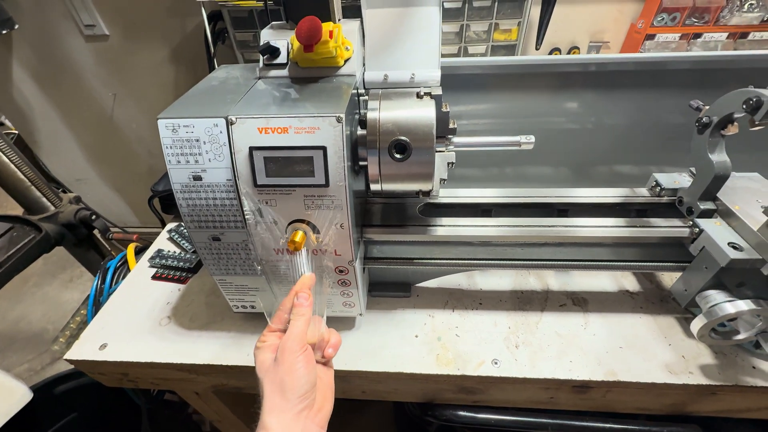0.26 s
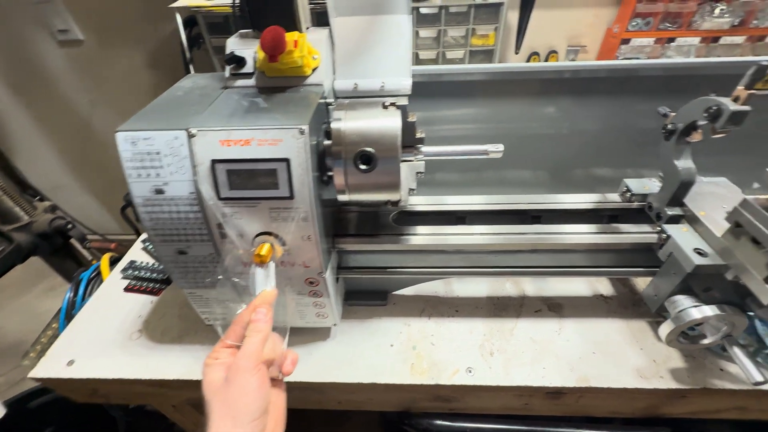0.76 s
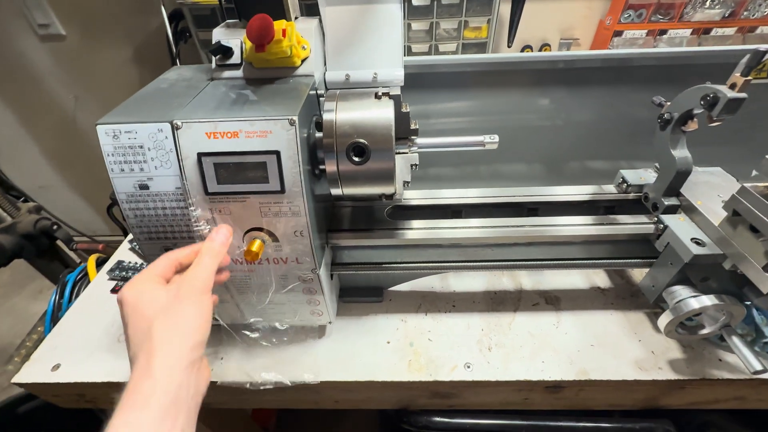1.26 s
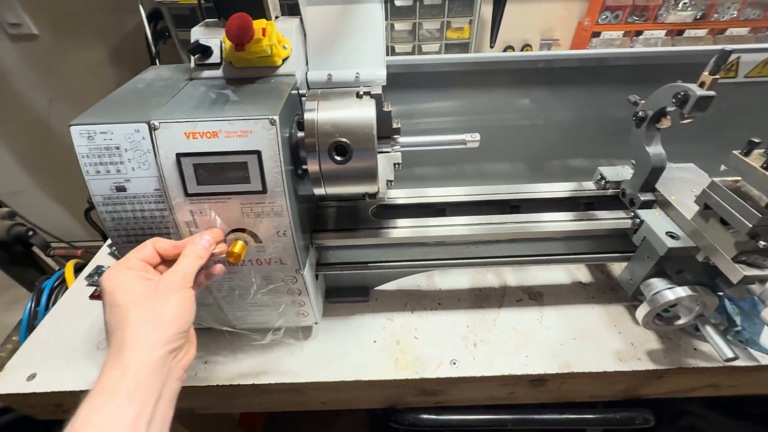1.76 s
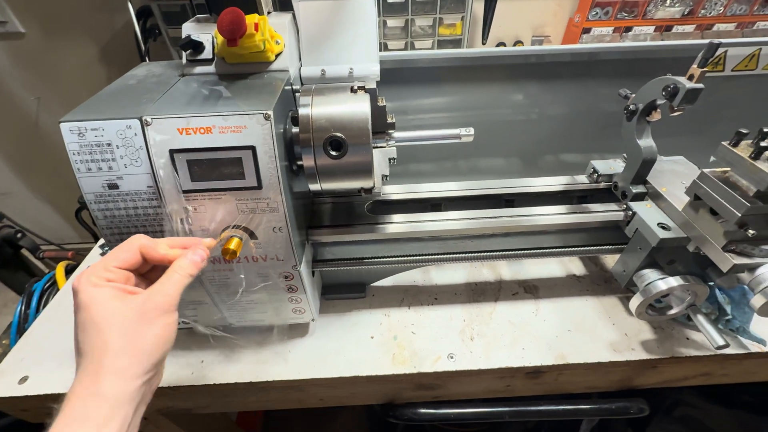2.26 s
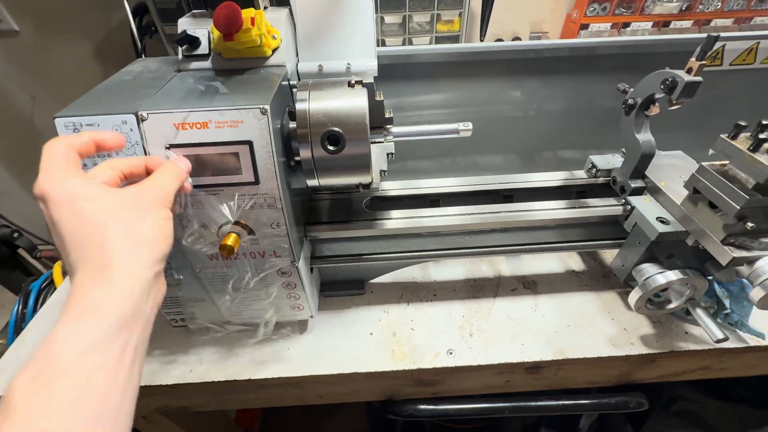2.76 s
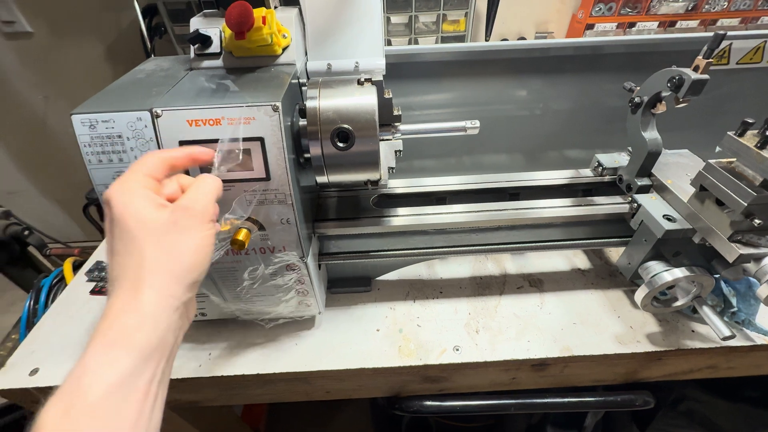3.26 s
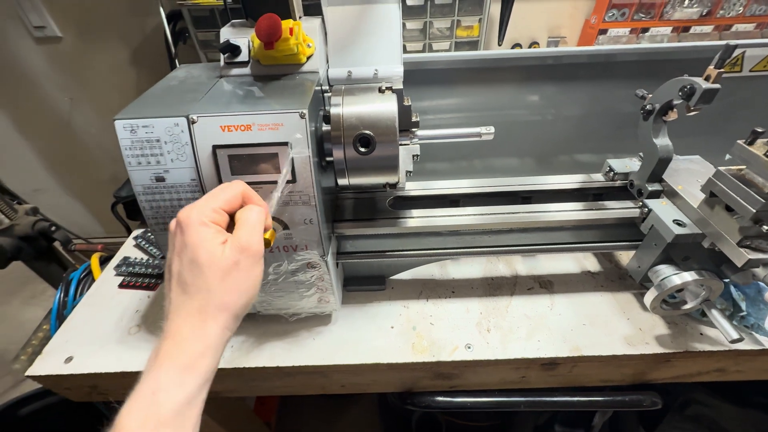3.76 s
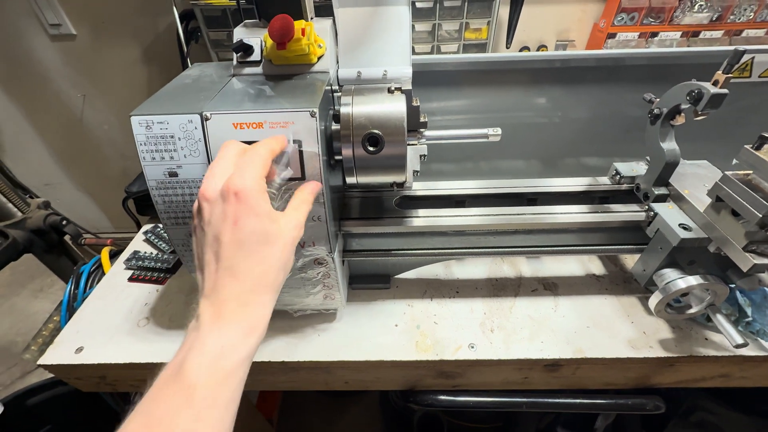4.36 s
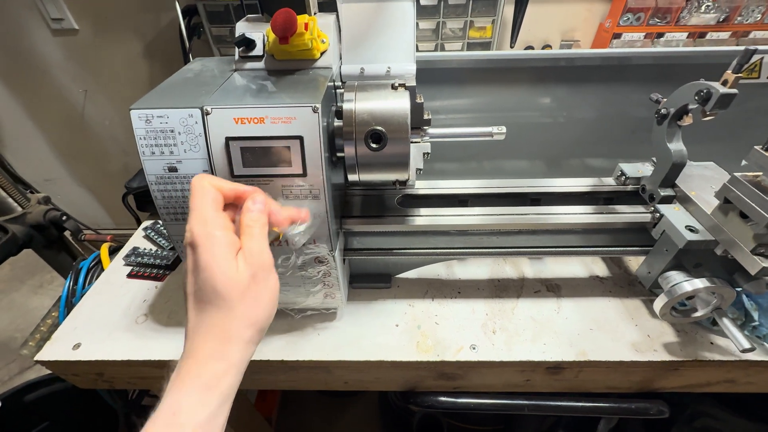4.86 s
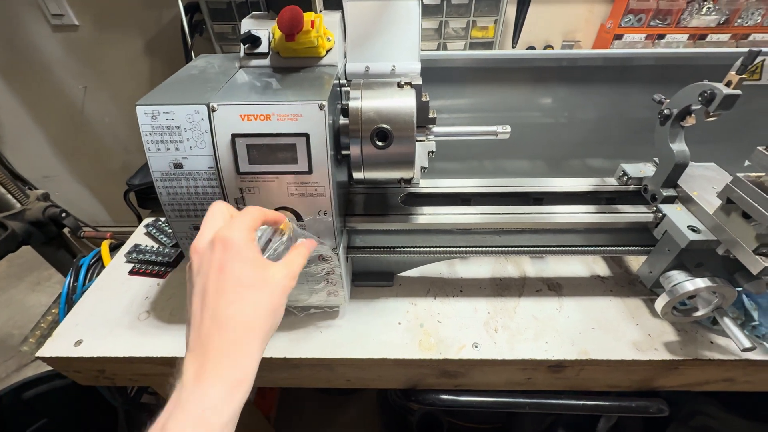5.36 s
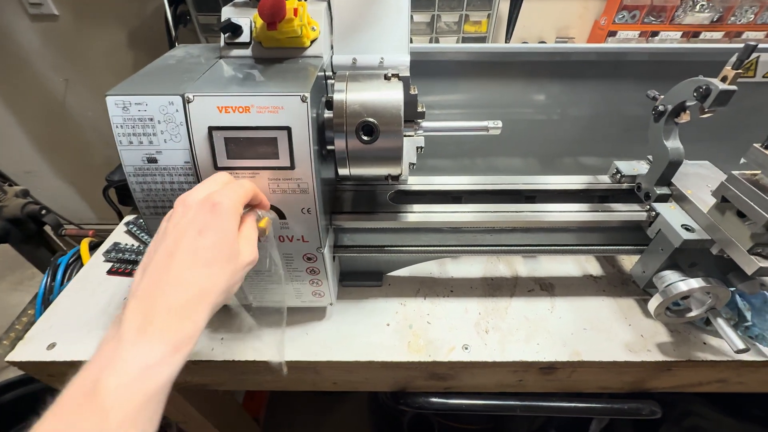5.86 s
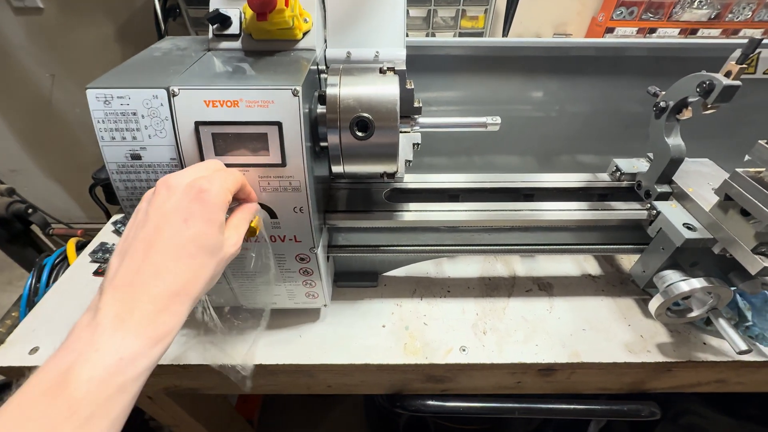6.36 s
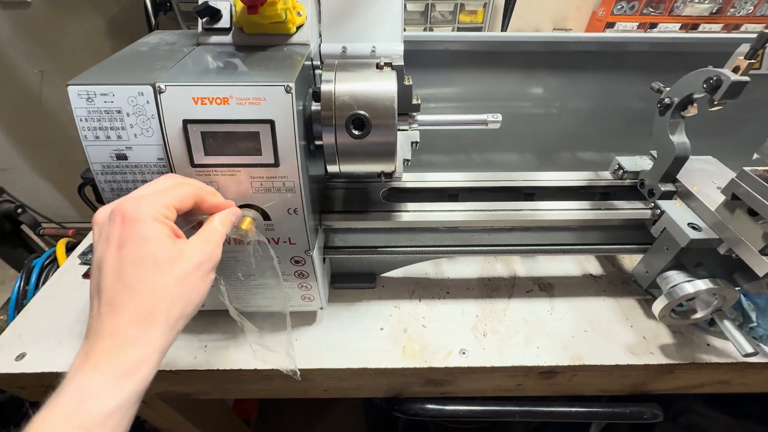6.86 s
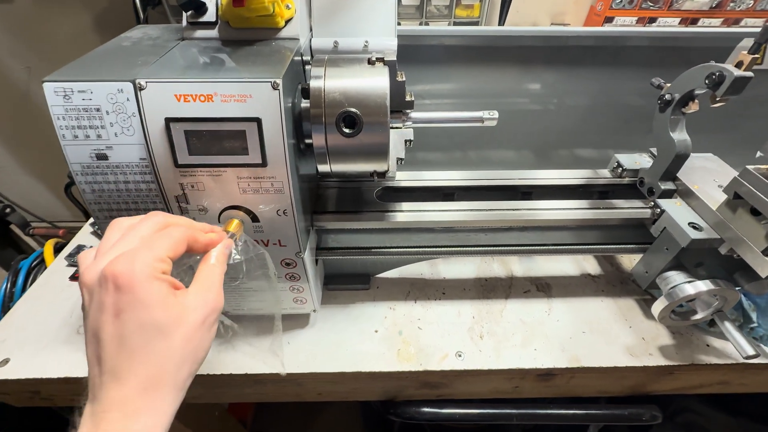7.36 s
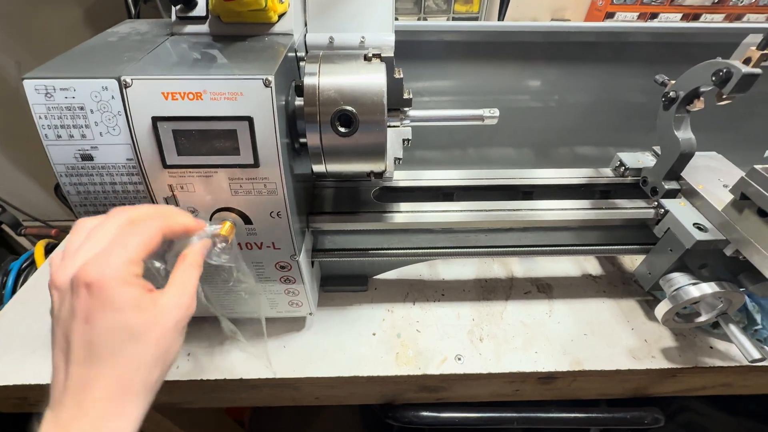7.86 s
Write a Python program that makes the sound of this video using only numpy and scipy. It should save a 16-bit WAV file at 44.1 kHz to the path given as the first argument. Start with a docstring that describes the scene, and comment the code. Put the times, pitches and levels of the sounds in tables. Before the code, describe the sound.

Protective plastic film is pulled by hand from a sheet-metal machine front. Loud irregular snaps with a short metallic ring come first, then a dense burst of coarse ripping around two seconds, a bright fizzing peel in several strokes, and finally light crinkles and ticks as loose film is picked from a knob. Close stereo microphones in a small workshop, short reverberation, soft room noise and a faint wavering hum.

```python
"""Loud snaps of glue letting go, then a long fizzing peel, as protective film is pulled by hand off the
sheet-metal front of a new lathe in a small workshop; the loose film crinkles as it is picked from a knob.
Snaps are short noise bursts with facet rings and bright clicks; peeling and picking are trains of random slips.
Decaying resonances give the panel's ring and short thuds, pops and thin rings; gliding tones squeak.
Behind them is soft room noise with a faint wavering hum."""
import sys
import numpy as np
from scipy import signal
from scipy.fft import rfft, irfft, next_fast_len
from scipy.io import wavfile
from scipy.ndimage import uniform_filter1d

SR = 44100
rng = np.random.default_rng(int(sys.argv[2]) if len(sys.argv) > 2 else 0)


def generate_wav(signal):
    """Clip the signal to [-1, 1] and save it as 16-bit WAV at the path in sys.argv[1]."""
    frames = np.transpose(np.atleast_2d(signal))
    scaled = np.clip(frames, -1, 1) * 32767
    pcm = np.round(scaled).astype(np.int16)
    wavfile.write(sys.argv[1], SR, pcm)


N = 358091
TIME = np.arange(N) / SR  # [s]


def from_db(db):
    """Decibels to amplitude gain."""
    return np.exp(np.asarray(db) * (np.log(10) / 20))


def unit_energy(x):
    """Scale each channel to a summed square of one."""
    return x / np.sqrt(np.sum(x ** 2, axis=-1, keepdims=True) + 1e-20)


def in_time(rows):
    """Interpolate the value columns of a curve at every sample."""
    time_s, *columns = np.transpose(rows)
    return [np.interp(TIME, time_s, column) for column in columns]


def at_hz(points, hz):
    """Read a spectrum on a log-frequency axis."""
    known_hz, values = np.transpose(points)
    return np.interp(np.log(np.maximum(hz, 1)), np.log(known_hz), values)


def band(x, hz, kind, order=2):
    """Butterworth filter."""
    sos = signal.butter(order, np.clip(hz, 10, .45 * SR), kind, fs=SR, output="sos")
    return signal.sosfilt(sos, x + 1e-18)


def drift(knots_per_s):
    """Slow chance: unit-normal knots joined by straight lines."""
    knots = rng.standard_normal(N // 20)
    return np.interp(TIME * knots_per_s, np.arange(len(knots)), knots)


def convolve(x, response):
    """Pass a sound through an impulse response."""
    return signal.oaconvolve(np.atleast_2d(x), np.atleast_2d(response), axes=-1)[:, :N]


def coloured(x, spectrum, size=2048):
    """Causal minimum-phase filter, built by folding the cepstrum; keeps the power of white noise."""
    level_db = at_hz(spectrum, np.fft.rfftfreq(size, 1 / SR))
    cepstrum = irfft(np.log(from_db(level_db)))
    cepstrum[1:size // 2] *= 2
    cepstrum[size // 2 + 1:] = 0
    return convolve(x, unit_energy(irfft(np.exp(rfft(cepstrum)))))


def tilted(x, tilt_db, pivots_hz=(2000, 6000), slope=0.27):
    """Two seesaws between bass and treble tip the whole spectrum at about even loudness."""
    up = from_db(tilt_db * slope)
    for hz in pivots_hz:
        bass = band(x, hz, "low", order=1)
        x = (bass / up + (x - bass) * up) / np.sqrt((up ** 2 + up ** -2) / 2)
    return x


# room noise spectrum, relative: (frequency [Hz], level per Hz [dB])
ROOM_COLOUR = [(30, -20.5), (60, -5), (100, -10.5), (200, -13.5), (550, -22.5), (1300, -21.5), (4000, -26),
               (15000, -27)]
# hum, before waver: (frequency [Hz], level [dB rms])
HUM = [(107.7, -72.5), (161.5, -77.5)]


def room_tone(air_db=-68, side_db=-6, waver_db=3.5):
    """A low hum that wavers over soft room noise."""
    mid, side = coloured(rng.standard_normal((2, N)), ROOM_COLOUR)
    hum = np.zeros(N)
    for hz, level_db in HUM:
        gain = np.sqrt(2) * from_db(level_db + waver_db * drift(9.6))
        hum = hum + gain * np.sin(2 * np.pi * (hz * TIME + rng.random()))
    return hum + from_db(air_db) * (mid + from_db(side_db) * side * [[1], [-1]])


# workshop reverberation: (frequency [Hz], t60 [s])
ROOM_T60 = [(200, 0.25), (7000, 0.38), (15000, 0.028)]
# arrival lag at the right microphone: (least [s], most [s])
RIGHT_LAG_S = (.00039, .00046)


def sound_path(near_db=0.0, near_s=0.0018, near_top_hz=8000, early_db=-5.0, early_s=0.012,
               early_gap_s=.005, late_db=-7.5, late_rise_s=0.0069, size=22050):
    """Direct sound (left first), scatter off hand and panel, echoes off bench and lathe, then the room's tail."""
    t = np.arange(size) / SR
    direct = np.zeros((2, size))
    lag_s = rng.uniform(*RIGHT_LAG_S)
    direct[0, 0] = direct[1, round(lag_s * SR)] = 1
    near, early, late = rng.standard_normal((3, 2, size))
    near = near * np.exp(-t / near_s) * (t > [[0], [lag_s]])
    near = unit_energy(band(near, [1200, near_top_hz], "band", order=1))
    early = band(early, 6000, "low", order=1)
    early = unit_energy(early * np.exp(-t / early_s) * (t > early_gap_s))
    edges_hz = np.geomspace(60, 18000, num=9)
    tail = np.zeros((2, size))
    for k, (low, high) in enumerate(zip(edges_hz, edges_hz[1:])):
        decay = from_db(-60 * t / at_hz(ROOM_T60, np.sqrt(low * high)))
        tail += band(late, [low, high], "band") * decay * (-1) ** k
    tail = unit_energy(tail * (1 - np.exp(-t / late_rise_s)))
    echoes = from_db(early_db) * early + from_db(late_db) * tail
    # long waves reach both microphones alike
    mid, side = echoes[0], band(echoes[1], 340, "high", order=1)
    return direct + from_db(near_db) * near + (mid + side * [[1], [-1]]) / np.sqrt(2)


def workshop(x, moves_per_s=35, count=5):
    """The sounding spot jumps about the film; every spot has its own path to the microphones."""
    spot = np.cumsum(moves_per_s * 2 * rng.random(N)) / SR + drift(10)
    out = 0
    for k in range(count):
        away = np.abs((spot - k + count / 2) % count - count / 2)
        share = np.sqrt(np.maximum(1 - away, 0))
        out = out + convolve(x * share, sound_path())
    return out


# channel balance: (frequency [Hz], left minus right [dB])
LEFT_LOUDER = [(150, 1.5), (600, 3.5), (1200, 1), (4400, 1), (8000, -1), (15000, -3.5)]


def off_centre(x):
    """Tip each frequency towards one microphone, half the difference on each side."""
    size = next_fast_len(N + 4096)
    lean_db = at_hz(LEFT_LOUDER, np.fft.rfftfreq(size, 1 / SR))
    return irfft(rfft(x, size) * from_db([lean_db / 2, -lean_db / 2]), size)[:, :N]


# jerks that shake the panel, before gain: (time [s], level [dB])
JERKS = [(.441, -39)]
# panel modes, relative: (frequency [Hz], level [dB], t60 [s])
PANEL = [(373, -10, 0.19), (1220, -2, 0.3), (1300, 6.5, 0.12), (1430, -11, 0.31)]


def panel_ring(vary_db=2.5):
    """Every jerk rings each decaying two-pole mode with a strength of its own."""
    time_s, level_db = np.transpose(JERKS)
    chance, out = rng.standard_normal((len(JERKS), len(PANEL))), np.zeros(N)
    for k, (hz, mode_db, t60_s) in enumerate(PANEL):
        clicks = np.full(N, 1e-18)
        clicks[(time_s * SR).astype(int)] = from_db(level_db + mode_db + vary_db * chance[:, k])
        r, w = from_db(-60 / (t60_s * SR)), 2 * np.pi * hz / SR
        out += (-1) ** k * signal.lfilter([0, np.sin(w)], [1, -2 * r * np.cos(w), r * r], clicks)
    return out


# short pitched thuds, pops and thin rings of film, panel and metal knob, before gain:
# (time [s], pitch [Hz], level [dB])
SHORT_RINGS = [(.076, 325, -26), (0.137, 507, -19), (.439, 334, -15.5), (0.4395, 1280, -10),
               (2.2035, 1760, -25.5), (2.267, 293, -26.5), (2.349, 236, -27), (2.492, 460, -36),
               (3.713, 253, -32.5), (4.681, 266, -30), (5.081, 470, -29), (6.09, 790, -26.5),
               (6.264, 2840, -43.5), (6.356, 2920, -39), (7.431, 590, -51), (7.665, 645, -47.5),
               (8.02, 780, -39)]


def short_rings(width_at_1khz_hz=240, overtone=1.55, overtone_db=-10, swell_cycles=0.92, size=2048):
    """Each thud, pop or thin ring swells and decays at its pitch with one overtone; high ones die sooner."""
    out, t = np.zeros(N + size), np.arange(size) / SR
    for time_s, hz, level_db in SHORT_RINGS:
        phase, start = 2 * np.pi * hz * t, int(time_s * SR)
        width_hz = width_at_1khz_hz * np.sqrt(hz / 1000)
        ring = np.sin(phase) - from_db(overtone_db) * np.sin(overtone * phase)
        ring = ring * np.exp(-np.pi * width_hz * t) * (1 - np.exp(-hz * t / swell_cycles))
        out[start:start + size] += from_db(level_db) * unit_energy(ring)
    return out[:N]


# groans and squeaks of sliding film, pitch following the pull; one curve each:
# (time [s], pitch before jitter [Hz], level [dB])
SQUEAKS = [
    [(2.238, 495, -32), (2.25, 480, -34), (2.34, 308, -67)],
    [(4.697, 1086, -46), (4.713, 1210, -39.5), (4.735, 1030, -39), (4.755, 1004, -57), (4.81, 1030, -62)],
]


def squeaks(jitter=0.023, octave_db=-16):
    """Fast stick-slip gives rough gliding tones with a weak octave."""
    out = np.zeros(N)
    for curve in SQUEAKS:
        hz, level_db = in_time(curve)
        phase = 2 * np.pi * np.cumsum(hz * (1 + jitter * drift(550))) / SR
        tone = np.sin(phase) + from_db(octave_db) * np.sin(2 * phase)
        out += tone * from_db(level_db) * (TIME > curve[0][0]) * (TIME < curve[-1][0])
    return out


# every stroke eases as the film gives, then lets go
EASE_DB_PER_S, RELEASE_DB_PER_S = 14.5, 271.5


def strokes(rows, attack_s):
    """Gain of a set of hand strokes: attack, slowly easing hold, release; overlaps add in power."""
    power = np.zeros(N)
    for start_s, length_s, level_db in rows:
        first = max(int(start_s * SR), 0)
        t = TIME[:N - first][:SR]
        fall_db = EASE_DB_PER_S * t + RELEASE_DB_PER_S * np.maximum(t - length_s, 0)
        power[first:first + len(t)] += (np.minimum(t / attack_s, 1) * from_db(level_db - fall_db)) ** 2
    return np.sqrt(power)


# slips build up to a snap, creases settle after it; levels relative to the SNAPS table
BUILD_DB, BUILD_DB_PER_S = -8.5, 2201.5
SETTLE_DB, SETTLE_DB_PER_S = -23, 235


def around_snaps():
    """Gain of the slips that build up to each snap and of the creases that settle after it."""
    time_s, level_db, _ = np.transpose(SNAPS)
    kicks = np.full(N, 1e-18)
    kicks[(time_s * SR).astype(int)] = from_db(level_db) ** 2
    # the build-up is a decay run backwards
    before = signal.lfilter([1], [1, -from_db(-BUILD_DB_PER_S / SR) ** 2], kicks[::-1])[::-1]
    after = signal.lfilter([1], [1, -from_db(-SETTLE_DB_PER_S / SR) ** 2], kicks)
    return np.sqrt(before * from_db(BUILD_DB) ** 2 + after * from_db(SETTLE_DB) ** 2)


def slip_train(per_s, spread_db, cap=4):
    """Clicks at random moments with random sign: many small, a few large."""
    at = np.flatnonzero(rng.random(N) < per_s / SR)
    sizes = rng.standard_exponential(N // 4)
    signs = rng.choice([-1, 1], N // 4)
    out = np.zeros(N)
    size_db = spread_db * np.minimum(np.resize(sizes, len(at)), cap)
    out[at] = from_db(size_db) * np.resize(signs, len(at))
    return out


def crackle(gain, per_s, tilt_db, flicker_db, fizz_db, spread_db=3.0, clump_db=5.0, clumps_per_s=200):
    """Tiny slips of the glue line come in clumps, over the fizz of film sliding on itself."""
    # a fast peel runs evenly, slack film in fits and starts
    uneven = (1000 / max(per_s, 100)) ** .3
    slips = slip_train(per_s * from_db(clump_db * uneven * drift(clumps_per_s)), spread_db)
    # the pull sets the energy that the slips share
    slips = slips / np.sqrt(np.maximum(uniform_filter1d(slips ** 2, size=900), 1e-3))
    slips = slips + from_db(fizz_db) * rng.standard_normal(N)
    return tilted(slips, tilt_db) * gain * from_db(flicker_db * uneven * drift(60))


def ticks(gain, per_s=45, spread_db=3.0, tilt_db=8):
    """Small creases flip one at a time, thin and bright, at the given gain over time."""
    return tilted(slip_train(per_s, spread_db, cap=6.8) * gain, tilt_db)


def stretched(x, span, width=0.28):
    """Broad resonances of the taut span between fingers and panel, added to the sound."""
    width = np.clip(width, .01, .8)  # half-width over centre frequency
    out = x
    for hz, level_db in span:
        out = out + from_db(level_db) * band(x, [hz * (1 - width), hz * (1 + width)], "band", order=1)
    return out


def gliding_resonance(x, curve, width_hz=220):
    """A resonance whose centre follows a curve: shift down to 0 Hz, lowpass, shift back."""
    turn = np.exp(2j * np.pi * np.cumsum(in_time(curve)[0]) / SR)
    r = np.exp(-np.pi * width_hz / SR)
    return 2 * np.real(turn * signal.lfilter([1 - r], [1, -r], x / turn + 1e-18))


def wandering(x, depth_db=2.0, per_s=28, count=14):
    """Creases tighten and slacken, so narrow resonances come and go; total energy is kept."""
    edges_hz = np.geomspace(600, 11000, num=count + 1)
    peaks = np.zeros(N)
    for low, high in zip(edges_hz, edges_hz[1:]):
        peaks += (from_db(depth_db * drift(per_s)) - 1) * band(x, [low, high], "band", order=1)
    return unit_energy(x + peaks) * np.sqrt(np.sum(x ** 2))


# stroke levels are before gain
# hard tugs that rip film off the glue: (start [s], length [s], level [dB])
RIPS = [(.074, 0.045, -30.5), (1.506, 0.044, -24.5), (1.69, 0.034, -30), (1.86, 0.25, -30),
        (2.24, 0.071, -28)]
# long, fast peels: (start [s], length [s], level [dB])
PEELS = [(2.845, 0.044, -41), (2.93, 0.12, -33.5), (3.058, .18, -35), (3.28, 0.044, -37.5),
         (3.325, 0.038, -33.5), (3.419, 0.13, -36), (3.625, 0.074, -36.5), (3.75, 0.16, -45),
         (4.68, .23, -39), (4.98, 0.14, -45)]
# fingers picking at loose film: (start [s], length [s], level [dB])
PICKS = [(.79, 0.1, -45), (.92, 0.19, -47.5), (1.395, 0.032, -50.5), (2.38, 0.25, -50.5),
         (2.74, 0.081, -54.5), (4.07, 0.13, -61), (4.41, 0.32, -59), (5.295, 0.3, -54), (5.62, 0.27, -49),
         (6.072, 0.073, -44.5), (6.56, 0.29, -55), (6.9, 0.043, -54.5), (7.1, 0.1, -60), (7.78, 0.37, -51),
         (8.07, 0.034, -43)]
# hanging film brushing hand and panel, before filters: (time [s], level [dB])
STIR = [(0, -45), (1.3, -58), (3.95, -58), (4.25, -69.5), (6.5, -56.5), (7.05, -77)]
# span resonances, short in a rip, long in a peel: (frequency [Hz], added level [dB])
SHORT_SPAN = [(2650, 1)]
LONG_SPAN = [(1550, -12), (4500, -10)]
# lowest note of the peeled span, sinks as it grows, rises at a fresh grip: (time [s], frequency [Hz])
SPAN_NOTE = [(2.88, 1250), (2.98, 920), (3.239, 564), (3.301, 1104), (3.381, 676), (3.44, 1387),
             (3.701, 666)]
# film spectrum, relative: (frequency [Hz], level per Hz [dB])
PEEL_COLOUR = [(50, -19.5), (220, -5), (500, -1.5), (640, -7), (830, 1.5), (1450, -1), (2000, -5.5),
               (2900, -2), (4500, -2.5), (7500, -4.5), (9200, 1.5), (12000, -2.5), (15500, -2.5)]


def worked_film(rip_db=-8.0, peel_db=-3.0, pick_db=-0.5, tick_db=14, note_db=1.0, stir_top_hz=2200):
    """Taut film rips coarse and dull, a peel is dense and bright, slack film ticks sparsely and brushes."""
    rip = np.hypot(strokes(RIPS, attack_s=0.0046), around_snaps())
    peel = strokes(PEELS, attack_s=0.0059)
    pick = strokes(PICKS, attack_s=0.003)
    ripping = crackle(rip, per_s=900, tilt_db=-5.0, flicker_db=0.5, fizz_db=-13)
    ripping = stretched(ripping, SHORT_SPAN)
    peeling = crackle(peel, per_s=1450, tilt_db=6.0, flicker_db=1.0, fizz_db=-18.5)
    peeling = stretched(peeling, LONG_SPAN, width=0.067)
    peeling = peeling + from_db(note_db) * gliding_resonance(peeling, SPAN_NOTE)
    picking = crackle(pick, per_s=450, tilt_db=0, flicker_db=1.0, fizz_db=-9)
    brushing = from_db(in_time(STIR)[0]) * band(rng.standard_normal(N), stir_top_hz, "low", order=1)
    film = from_db(rip_db) * ripping + from_db(peel_db) * peeling + from_db(pick_db) * picking + brushing
    # creases tick while loose film is picked, at half the stroke gain while it is peeled
    creases = from_db(tick_db) * ticks(np.hypot(pick, peel / 2))
    return coloured(wandering(film) + creases, PEEL_COLOUR)


def dispersed(x, corner_hz=580, count=12):
    """Bending waves in a sheet run slower at low pitch: allpasses delay the bass of a snap a few ms."""
    pole = np.exp(-2 * np.pi * corner_hz / SR)
    for _ in range(count):
        x = signal.lfilter([-pole, 1], [1, -pole], x + 1e-18)
    return x


# film jerking free or a crease flipping, before gain: (time [s], level [dB], treble tilt before slope [dB])
SNAPS = [(0.0203, -13, -11.5), (0.07, -8, -37), (0.106, -16, -12), (0.1349, -15.5, -26),
         (0.1594, -18.5, -20), (0.2776, -16.5, -28), (0.3271, -20.5, -8), (0.439, -15, -11.5),
         (0.603, -18.5, -14.5), (0.662, -30, 1), (0.852, -28.5, 3), (1.088, -30, -5), (1.468, -36.5, -29),
         (1.5429, -16, -2), (1.5622, -21.5, 4), (1.573, -14.5, -21), (1.6655, -17.5, -10),
         (1.6963, -12.5, -16), (1.7268, -18, -14), (1.8225, -14, -16.5), (1.856, -11.5, -12),
         (1.8766, -14, -10), (1.882, -20, -18), (1.9034, -13.5, -9), (1.9194, -15, -17), (1.934, -11.5, -5),
         (1.966, -15.5, -4), (1.9838, -14, -9), (1.9969, -14.5, -0.5), (2.0211, -14, -7),
         (2.035, -20.5, -5), (2.0546, -18.5, -17), (2.0664, -22.5, -17), (2.0799, -17.5, -27),
         (2.124, -26, 0), (2.2369, -10.5, -23), (2.2624, -13, -10), (2.343, -19, -12), (2.49, -25, -21),
         (2.916, -27, 16), (3.418, -24, 10), (3.642, -27.5, 17), (3.7114, -18.5, 0.5), (3.8742, -37, 36),
         (3.913, -26.5, 33), (4.1388, -40.5, 8), (4.439, -41.5, 33), (4.6781, -20, -2.5),
         (4.8353, -21.5, -9), (5.298, -42.5, -12.5), (5.496, -31.5, -15), (5.626, -32.5, -2),
         (5.706, -30, -7), (5.768, -35.5, 0), (5.846, -37, 31), (5.908, -33.5, -3), (6.0832, -26.5, 5.5),
         (6.09, -27.5, -18), (6.266, -40, -3), (6.3555, -42, 14), (6.4204, -40, -8), (6.6123, -28.5, 9),
         (6.712, -35, -26), (6.7411, -34, 1), (6.7962, -37.5, -6), (7.253, -44, 9), (7.3416, -44.5, 3),
         (7.3975, -43, 16), (7.4895, -38.5, -11), (7.556, -47.5, 2.5), (7.731, -47, 18.5), (7.772, -41, 25),
         (7.803, -37.5, 19), (7.8565, -31, 10), (7.8864, -33, -4), (7.946, -35.5, 0)]
# snap body spectrum, relative: (frequency [Hz], level per Hz [dB])
SNAP_COLOUR = [(50, -28), (220, -15), (520, -5.5), (640, -12.5), (800, -2), (1400, -6), (2000, -10.5),
               (3000, -6), (4500, -2.5), (7500, -5.5), (9000, 2), (11500, -0.5), (15500, -7)]


def snaps(rise_s=.0004, flutter_s=0.0003, crack_db=3.0, crack_low_hz=9000, crack_per_tilt=0.18,
          facet_db=-8.5, facet_width_hz=600, count=6, size=512):
    """A bright crack, a short duller flutter, and the brief ring of the facets that flipped."""
    (bodies, cracks), t = np.zeros((2, N + size)), np.arange(size) / SR
    for time_s, level_db, tilt_db in SNAPS:
        # flaps of different sizes flutter for different times
        decay_s = flutter_s * 2 ** rng.uniform(-0.24, 1)
        shape = (1 - np.exp(-t / rise_s)) * np.exp(-t / decay_s)
        flutter = unit_energy(band(rng.standard_normal(size), crack_low_hz, "low", order=1) * shape)
        facets_hz = np.exp(rng.uniform(np.log(1800), np.log(11000), (count, 1)))
        facets = np.sum(np.sin(2 * np.pi * facets_hz * t), axis=0)
        facets = unit_energy(facets * np.exp(-np.pi * facet_width_hz * t))
        body = tilted(flutter + from_db(facet_db) * facets, tilt_db)
        start = int(time_s * SR)
        bodies[start:start + size] += from_db(level_db) * body
        # stiffer, brighter snaps crack harder
        cracks[start + int(rise_s * SR)] += from_db(level_db + crack_db + crack_per_tilt * tilt_db)
    return dispersed(coloured(bodies[:N], SNAP_COLOUR)) + band(cracks[:N], crack_low_hz, "high")


# film pulled taut, snaps ring the short span too: (from [s], to [s])
TAUT_S = (1.5, 2)


def scene(snap_db=16.0, panel_db=3.0, short_ring_db=14.5, bodies_low_hz=200):
    """Film, panel and squeaks off centre in the workshop; thin sheets radiate little bass."""
    snapping = from_db(snap_db) * snaps()
    taut = (TIME > TAUT_S[0]) & (TIME < TAUT_S[1])
    film = stretched(snapping * taut, SHORT_SPAN) + snapping * ~taut + worked_film()
    bodies = from_db(panel_db) * panel_ring() + from_db(short_ring_db) * short_rings()
    heard = workshop(film + band(bodies, bodies_low_hz, "high"))
    heard = heard + convolve(squeaks(), sound_path())
    return off_centre(heard + room_tone())


CUTOFF_HZ = 16000


def record(dry, opposed_db=-17):
    """Microphones opposed around 13 kHz, alike above it: mid notched, side lowpassed; clip, cut the top."""
    mid, side = (dry[0] + dry[1]) / 2, (dry[0] - dry[1]) / 2
    notch = signal.butter(3, [11900, 14700], "stop", fs=SR, output="sos")
    notched = signal.sosfiltfilt(notch, mid)
    mid = notched + from_db(opposed_db) * (mid - notched)
    side = signal.sosfiltfilt(signal.butter(6, 15200, fs=SR, output="sos"), side)
    pair = np.clip(mid + side * [[1], [-1]], -1, 1)
    return signal.sosfilt(signal.ellip(8, .3, 75, CUTOFF_HZ, fs=SR, output="sos"), pair)


dry = scene()
out = record(dry)
generate_wav(out)
```